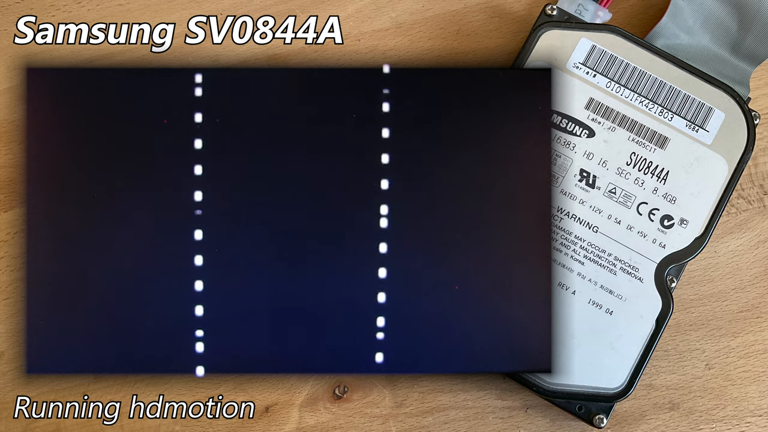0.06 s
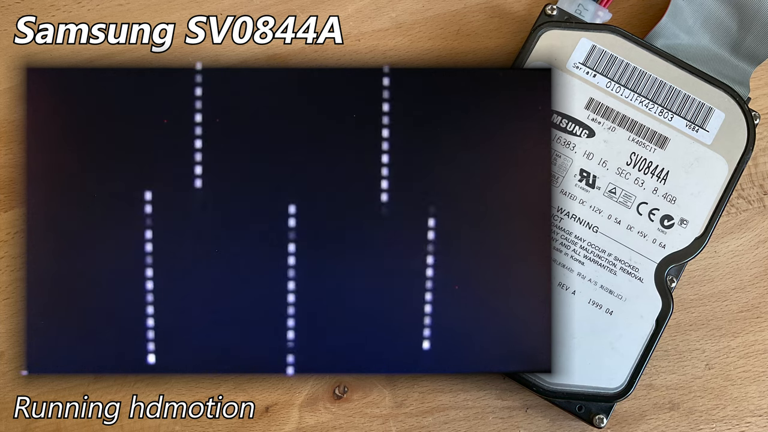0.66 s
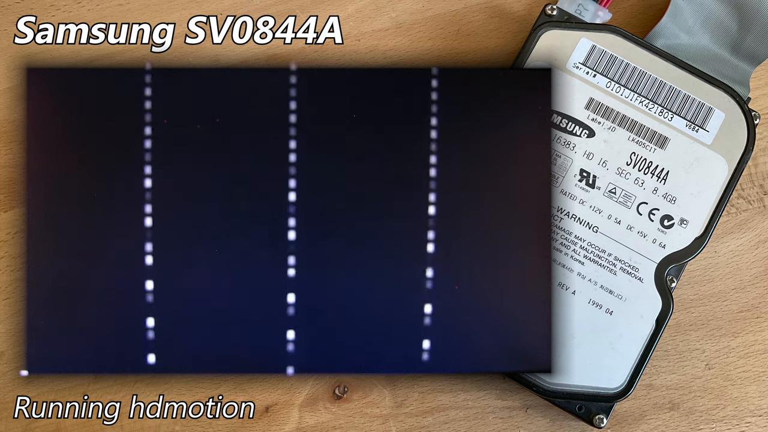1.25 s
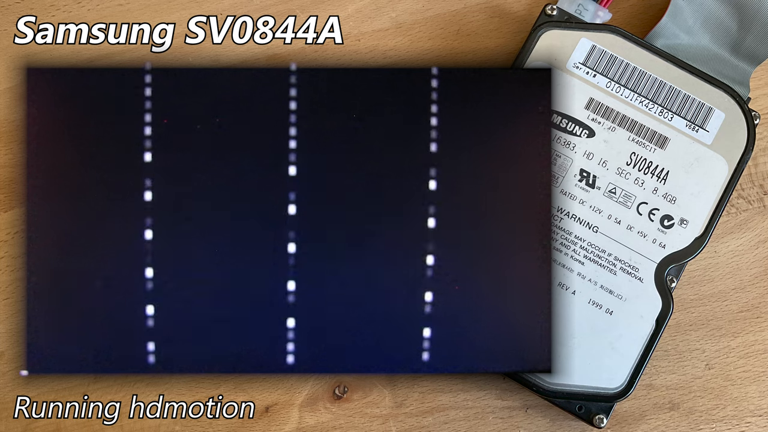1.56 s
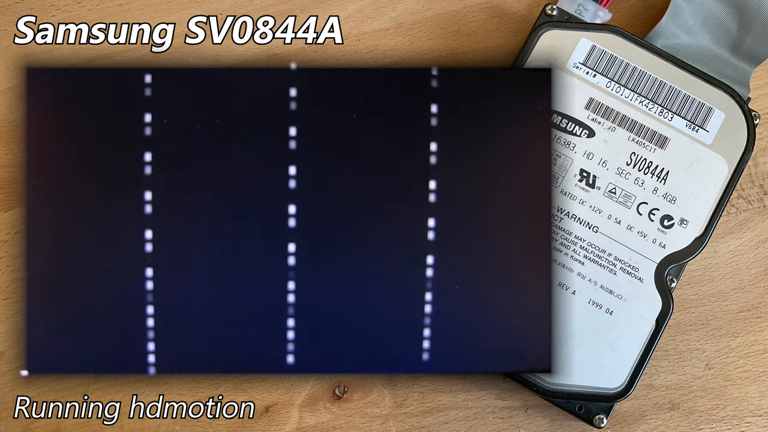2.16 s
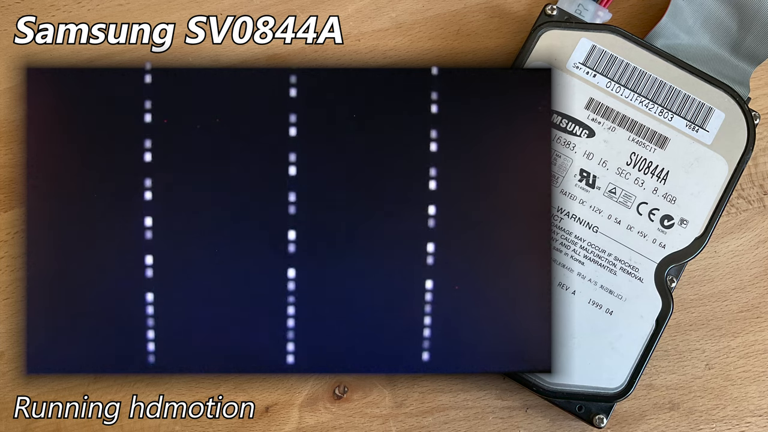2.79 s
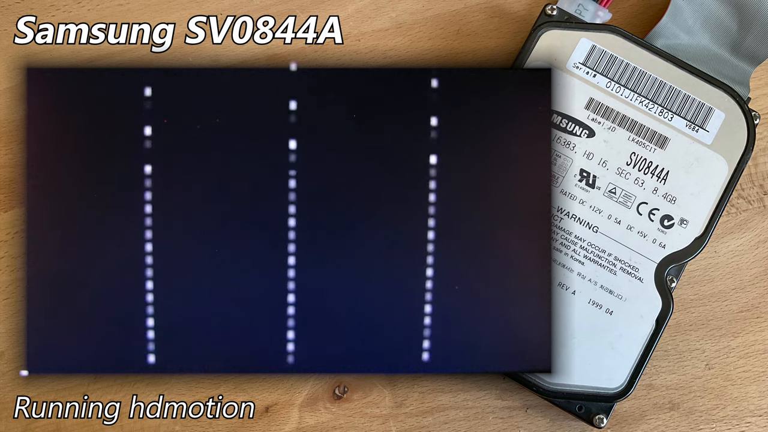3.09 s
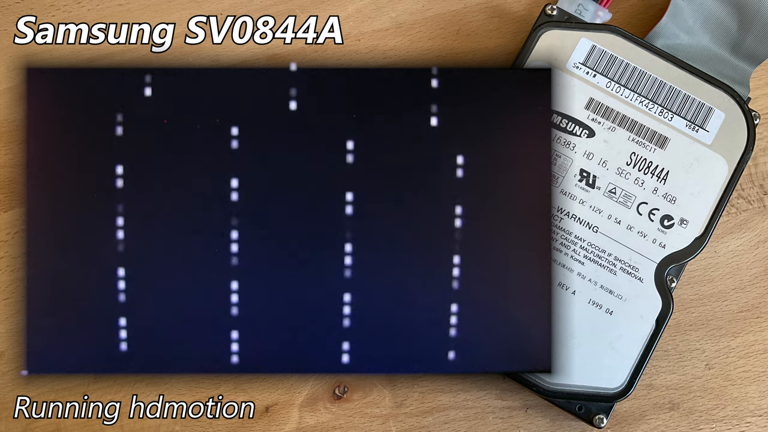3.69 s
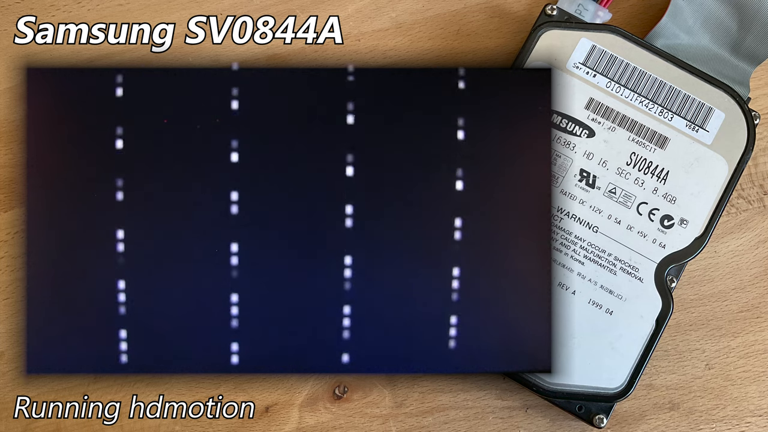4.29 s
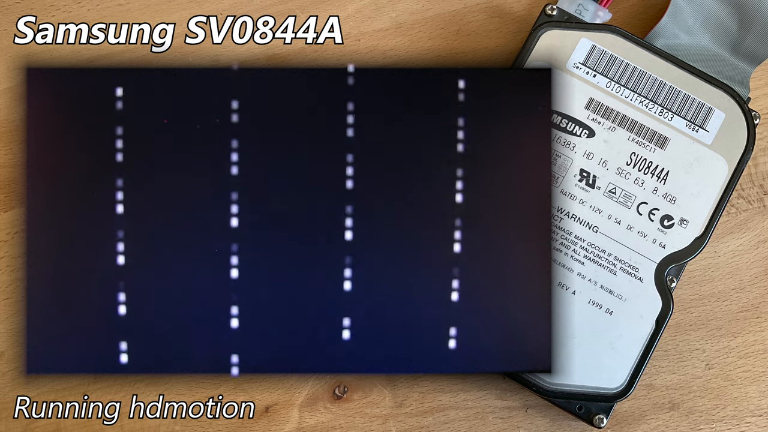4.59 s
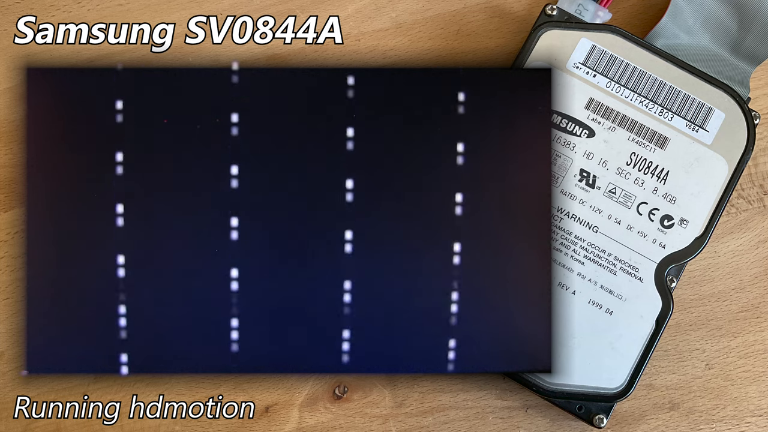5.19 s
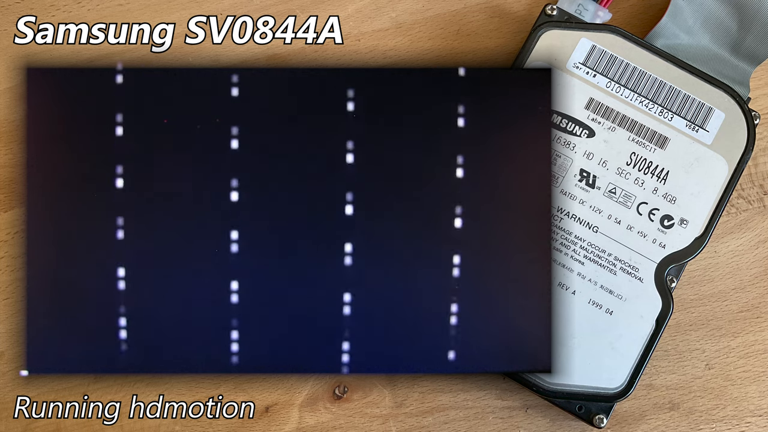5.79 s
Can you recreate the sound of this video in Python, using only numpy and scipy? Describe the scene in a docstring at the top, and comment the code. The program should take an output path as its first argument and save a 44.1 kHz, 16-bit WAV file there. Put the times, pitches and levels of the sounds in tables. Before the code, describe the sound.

Close to the microphone, an old hard drive whines with many shimmering high tones above a low hum. Almost at once the heads begin hopping back and forth, rocking the case against the desk in a fast, low, mechanical pulse topped with small ticks and a thin ring. Midway the rhythm changes to a different rolling rattle, while the platters keep spinning at the same pitch.

```python
"""A steady whine of many tones over a low hum and rush of air: an old hard drive spins at 5400 rpm on a
wooden desk, close by, its ball bearings ringing at fixed multiples of the spindle speed. After a moment
the head arm starts to hop in a loop over three tracks, later four, locked to the turning of the platters.
Each seek pushes and brakes the arm: the recoil rocks the case on the desk with a deep throb, the arm and
lid tick, and the thin head suspension pings."""
import sys
import numpy as np
from scipy import signal
from scipy.fft import rfft, irfft, next_fast_len
from scipy.io import wavfile
from scipy.ndimage import map_coordinates

SR = 44100
rng = np.random.default_rng(int(sys.argv[2]) if len(sys.argv) > 2 else 0)


def to_wav(sig):
    """Store sig (one row per channel, or 1-D mono) as 16-bit WAV at the path in sys.argv[1].

    Samples outside -1..1 are clipped; the rate is SR.
    """
    pcm = np.clip(np.atleast_2d(sig), -1, 1) * 32767
    pcm = np.round(pcm).astype(np.int16)
    wavfile.write(sys.argv[1], SR, pcm.T)  # frames by channels


N = 266805
SPIN_HZ, TOP_HZ = 90.02, 15600

# seek loops: (start [s], round length [turns], rounds [count], track sway period [s], crest delay [s])
LOOPS = [(.4, 5, 53, .5303, .207), (3.35, 7, 35, .1717, .002)]
# seeks of one round: (time [s], duration [s], signed force [relative], time sway [s], duration sway [s])
THREE_TRACKS = [(.00247, .0091, .17, 0, -.0007), (.01163, .014, 1.11, .0001, -.00016),
                (.0414, .0057, -.24, .0008, -.0012)]
FOUR_TRACKS = [(.0111, .0072, -.34, 0, .0001), (.0193, .0124, -1.22, -.00014, -.0001),
               (.0422, .0137, .88, -.00035, .0006), (.058, .0132, -.69, .00034, -.0001)]
# the hop that starts the first loop: (time [s], duration [s], force [relative])
FIRST_SEEK = (.399, 0.0125, 0.7)
# the case rocking on the desk: (frequency [Hz], bandwidth [Hz], gain [dB], signed weight [ratio])
CASE_MODES = [(71.2, 8.5, -23.5, 0.66), (118.75, 24.38, 10, -0.917), (124.64, 28.63, 12, 1),
              (156.67, 23.34, 6.5, -0.88), (231.37, 15.52, 17.5, -1), (234.7, 17.15, 14.5, 1),
              (355.5, 23, -7, 0.78)]
# ringing of the lid and head arm: (frequency [Hz], bandwidth [Hz], relative gain [dB])
ARM_MODES = [(340.7, 18.3, 4.5), (429, 20, -3.5), (606, 35, -6), (1744, 100, -16), (2594, 76, -8.5),
             (3703, 93, -4), (5830, 360, -20), (7430, 130, -14), (7790, 87, -17)]
# ringing of the suspension: (three-track level [dB], four-track level [dB])
PING_DB = [-41.5, -47.5]
# loose parts and desk top: (frequency [Hz], relative spectral level [dB])
RUMBLE_SPECTRUM = [(30, -46), (68, -9), (110, -5), (250, -3.5), (340, -11), (620, -29.5), (800, -42),
                   (1400, -43.5), (3000, -70)]
# bearing tones: (frequency [Hz], relative level [dB])
BEARING_TONES = [(813, -61.5), (1085, -63.4), (1267, -63.7), (1422, -64.3), (1934, -59.5), (2171, -55.3),
                 (2319, -54.2), (2373, -51.9), (2599, -55.2), (2616, -48.8), (2709, -54.6), (2760, -49.3),
                 (2843, -50.1), (2881.4, -41.1), (3037, -53.3), (3092, -53.3), (3422, -50.3), (3537, -45.6),
                 (3602, -51.6), (3816, -46.6), (3864, -53), (3923, -48.8), (4203, -52.5), (4312, -52.2),
                 (4360, -54.9), (4590, -56.5), (4699, -51), (4977, -54.5), (5077, -54.3), (5233, -52.5),
                 (5270, -50.5), (5285, -55), (5463, -53), (5473, -53), (5763, -53), (5806, -56.8),
                 (5859, -55.4), (6105, -56.4), (6181, -53.5), (6483, -48.5), (6540, -52), (6574, -53),
                 (6755, -56.2), (6859, -57.2), (6954, -53), (6967, -48.7), (7420, -58.8), (8553, -68.6),
                 (9217, -67.3), (9727, -68.9)]
# bearing tones with a twin just above: (frequency [Hz], beat rate [Hz], time of one crest [s])
BEATING_PAIRS = [(1548.2, .81, 1.22), (2263.4, 11.1, .02), (2565.5, 4.88, .086), (2649.8, 5.1, .059),
                 (6567.3, 12.84, .033)]
# slow swells of the upper four of these tones: (time [s], level [dB])
LOW_SWELL = [(0, -43.5), (2.1, -46.5), (3.2, -59.5), (6.05, -68)]
MAIN_SWELL = [(0, -44.4), (0.3, -47), (1.1, -37.5), (1.901, -34.3), (3.001, -37.5), (4.1, -37.5),
              (4.6, -52), (6.05, -58)]
UPPER_SWELL = [(0, -39), (1.7, -39.3), (2.45, -53), (3.002, -46), (3.8, -45), (4.5, -37.5), (6.05, -40.5)]
HIGH_SWELL = [(0, -39.3), (0.7, -33.5), (1.4, -38.5), (2.45, -61), (3.2, -42), (4, -52), (4.5, -41),
              (5.3, -36.5), (6.05, -44.6)]
# steady twins of the three lower pairs: (level [dB]) each
TWIN_DB = [-64, -62, -48.5]
# swelling twins of the two higher pairs: (time [s], level [dB])
UPPER_TWIN = [(0, -48), (1.5, -45.5), (4.7, -41), (6.05, -43.5)]
HIGH_TWIN = [(0.5, -56), (1.6, -45.5), (3.4, -61), (4.4, -46), (5.1, -41.5), (6.05, -55)]
# faint bearing overtones: (frequency [Hz], mean relative level [dB])
OVERTONE_SPECTRUM = [(2500, -66), (4000, -62), (5500, -60.5), (7000, -65), (8300, -75), (10300, -76),
                     (11500, -85), (12400, -76), (13300, -91), (15500, -100)]
# air churned by the platters: (frequency [Hz], relative spectral level [dB])
AIR_SPECTRUM = [(20, -31), (60, 5), (120, 9.5), (200, 6), (620, -2), (780, -13.5), (1500, -19.5),
                (2300, -11.5), (2750, -10.5), (3450, -9.5), (5800, -17.5), (7100, -16.5), (8300, -31),
                (11000, -40), (15000, -57)]


def arm_seeks(scatter_s, scatter_db):
    """Synchronous motion: each round awaits the same sectors, while track sway alters the hops' length."""
    rows = [FIRST_SEEK]
    for (start, turns, rounds, sway_s, crest_s), pattern in zip(LOOPS, [THREE_TRACKS, FOUR_TRACKS]):
        for elapsed in np.arange(rounds) * turns / SPIN_HZ:
            sway = np.cos(2 * np.pi * (elapsed - crest_s) / sway_s)
            for onset, span, force, late, longer in pattern:
                rows.append((start + elapsed + onset + late * sway, span + longer * sway, force))
    onset, span, force = np.transpose(rows)
    time_jitter, force_jitter = rng.standard_normal((len(onset), 2)).T
    return np.transpose([onset + scatter_s * time_jitter, span, force * amp(scatter_db * force_jitter)])


def case_throb(seeks, gain_db):
    """Action and reaction: the coil pushes the arm, then brakes it, and the recoil rocks the case."""
    push_share = .53
    recoil = np.zeros(N + SR)
    for onset, span, force in seeks:
        progress = np.arange(int(span * SR)) / (span * SR)
        push = np.sin(np.pi * progress / push_share) / push_share
        brake = -np.sin(np.pi * (progress - push_share) / (1 - push_share)) / (1 - push_share)
        add_at(recoil, onset, force * np.where(progress < push_share, push, brake))
    case = lambda f: sum(weight * amp(db) * resonance(f, hz, width) for hz, width, db, weight in CASE_MODES)
    return amp(gain_db) * filtered(recoil, case)


def arm_ticks(seeks, level_db, buzz, buzz_s, force_power):
    """Impulse excitation: the switching coil current rings arm and lid; the servo adds a decaying buzz."""
    drive, t = np.zeros(N + SR), np.arange(SR // 20) / SR
    for onset, span, force in seeks:
        size = abs(force) ** force_power
        for share, edge in [(0, 0.47), (.5, -0.22), (1, 0.33)]:  # start, turn and end of the seek
            drive[int((onset + share * span) * SR)] += size * edge * np.sign(force)
        add_at(drive, onset, size * buzz * np.exp(-t / buzz_s) * rng.standard_normal(len(t)))
    arm = lambda f: sum((-1) ** k * amp(db) * resonance(f, hz, width) * abs(resonance(f, hz, 5 * width))
                        for k, (hz, width, db) in enumerate(ARM_MODES))
    return amp(level_db) * unit(filtered(drive, arm))


def suspension_pings(seeks, ring_hz, width_hz, force_power, shudder):
    """Resonance: each seek flicks and shakes the thin head suspension; stronger seeks ring it more."""
    shake = np.zeros(N + SR)
    for onset, span, force in seeks:
        progress = np.arange(int(span * SR)) / (span * SR)
        flick = (progress == 0) + shudder * (1 - progress) * rng.standard_normal(len(progress))
        add_at(shake, onset, abs(force) ** force_power * flick)
    mode = lambda f: resonance(f, ring_hz, width_hz) * resonance(f, ring_hz, 4 * width_hz)
    in_first_loop = np.arange(N) / SR < LOOPS[1][0]
    return amp(np.where(in_first_loop, *PING_DB)) * unit(filtered(shake, mode))


def desk_rumble(seeks, level_db, decay_s):
    """Damped random vibration: every seek shakes the loose parts and desk top a little differently."""
    shake, t = np.zeros(N + SR), np.arange(SR // 10) / SR
    for onset, _, force in seeks:
        add_at(shake, onset, abs(force) * np.exp(-t / decay_s) * rng.standard_normal(len(t)))
    return amp(level_db) * unit(filtered(shake, lambda f: spectrum_gain(RUMBLE_SPECTRUM, f)))


def bearing_whine(clock, gain_db, waver_db):
    """Rolling contact: balls on worn races ring at fixed multiples of the spin, each tone wavering."""
    return amp(gain_db) * sum(amp(db + waver_db * wobble(5.3)) * sine(hz * clock + rng.random())
                              for hz, db in BEARING_TONES)


def bearing_beats(clock, lowest_db):
    """Interference: five bearing tones beat against slightly higher twins; all but the lowest swell."""
    levels = [lowest_db] + [envelope(swell) for swell in (LOW_SWELL, MAIN_SWELL, UPPER_SWELL, HIGH_SWELL)]
    twins = list(TWIN_DB) + [envelope(swell) for swell in (UPPER_TWIN, HIGH_TWIN)]
    pairs = np.zeros(N)
    for (hz, beat_hz, crest_s), level_db, twin_db in zip(BEATING_PAIRS, levels, twins):
        cycles = hz * clock + rng.random()
        pairs += amp(level_db) * sine(cycles)
        pairs += amp(twin_db) * sine(cycles + beat_hz * (clock - crest_s))
    return pairs


def bearing_overtones(clock, gain_db, spread_db, count):
    """Superposition: a dense comb of faint tones shimmers as each beats with a weaker twin."""
    size = 8 * SR
    hz = 2500 + 13000 * (np.arange(count) + rng.random(count)) / count
    unevenness = unit(amp(spread_db * rng.uniform(-1, 1, count)))
    gain = amp(gain_db) * spectrum_gain(OVERTONE_SPECTRUM, hz) * unevenness
    lines = np.zeros(size // 2 + 1, complex)
    for offset_hz, share in [(0, 1), (rng.uniform(1, 7.7, count), .45)]:
        bins = ((hz + offset_hz) * size / SR).astype(int)
        lines[bins] += share * gain * np.exp(2j * np.pi * rng.random(count))
    comb = irfft(lines) * size / np.sqrt(2)
    return map_coordinates(comb, [clock * SR], mode="wrap")  # the pitch follows the spindle speed


def platters(clock, hum_db, heavy_spot_turns, air_db):
    """Rotating imbalance and turbulence: the heavy spot hums once a turn; the platters churn the air."""
    hum = sine(SPIN_HZ * clock + heavy_spot_turns)
    air = unit(filtered(rng.standard_normal(N), lambda f: spectrum_gain(AIR_SPECTRUM, f)))
    return amp(hum_db) * hum + amp(air_db) * air


def resonance(f, hz, width):
    """Damped oscillator: the causal response of one mode."""
    return 1j * f * width / (hz * hz - f * f + 1j * f * width)


def filtered(x, response):
    """Linear filtering: the spectrum of x times a frequency response."""
    size = next_fast_len(N + SR // 2)
    return irfft(rfft(x, size) * response(np.fft.rfftfreq(size, 1 / SR)), size)[:N]


def spectrum_gain(points, hz):
    """Spectral envelope: gain from (frequency [Hz], level [dB]) points on a log frequency axis."""
    f, db = np.transpose(points)
    return amp(np.interp(np.log(hz + 1), np.log(f + 1), db))


def envelope(points):
    """Linear interpolation of (time [s], level [dB]) points at every sample."""
    return np.interp(np.arange(N) / SR, *np.transpose(points))


def wobble(rate):
    """Random modulation: a smooth curve with rate knots a second."""
    knots = np.linspace(0, N / SR * rate, N // 200)
    coarse = map_coordinates(rng.standard_normal(256), [knots], mode="mirror")
    return np.interp(np.arange(N), np.linspace(0, N, len(coarse)), coarse)


def add_at(track, onset_s, burst):
    """Superposition of a burst on a track, in place."""
    track[int(onset_s * SR):][:len(burst)] += burst


def sine(cycles):
    """Simple harmonic motion of rms 1."""
    return np.sqrt(2) * np.sin(2 * np.pi * cycles)


def amp(db):
    """Decibels to amplitude ratio."""
    return 10 ** (np.asarray(db) / 20)


def unit(x):
    """Normalisation to rms 1."""
    return x / np.sqrt(np.mean(x ** 2) + 1e-20)


def scene():
    """Superposition: the sounds of the seeking arm add to those of the spinning drive."""
    clock = np.cumsum(1 + .0001 * wobble(3)) / SR  # the motor's speed hunts slightly, and all tones with it
    seeks = arm_seeks(scatter_s=.00008, scatter_db=.2)
    throb = case_throb(seeks, gain_db=0.99)
    rumble = desk_rumble(seeks, level_db=-33.0, decay_s=0.03)
    ticks = arm_ticks(seeks, level_db=-37.5, buzz=0.13, buzz_s=0.023, force_power=0.052)
    pings = suspension_pings(seeks, ring_hz=3681, width_hz=72, force_power=0.4, shudder=0.05)
    whine = bearing_whine(clock, gain_db=-0.14, waver_db=1.94)
    beats = bearing_beats(clock, lowest_db=-57.5)
    shimmer = bearing_overtones(clock, gain_db=-1, spread_db=9, count=320)
    drone = platters(clock, hum_db=-29.0, heavy_spot_turns=0.53, air_db=-32)
    return (throb + rumble + ticks + pings + whine + beats + shimmer + drone)[None]


def record(dry):
    """Band limiting: the microphone loses the deepest bass and top treble; a 5 ms fade ends the sound."""
    bass_cut = signal.butter(1, 12, "highpass", fs=SR, output="sos")
    top_cut = signal.ellip(10, .1, 90, TOP_HZ, fs=SR, output="sos")
    fade = np.minimum(np.arange(N)[::-1] / (.005 * SR), 1)
    return fade * signal.sosfilt(np.vstack([bass_cut, top_cut]), dry)


dry = scene()
out = record(dry)
to_wav(out)
```